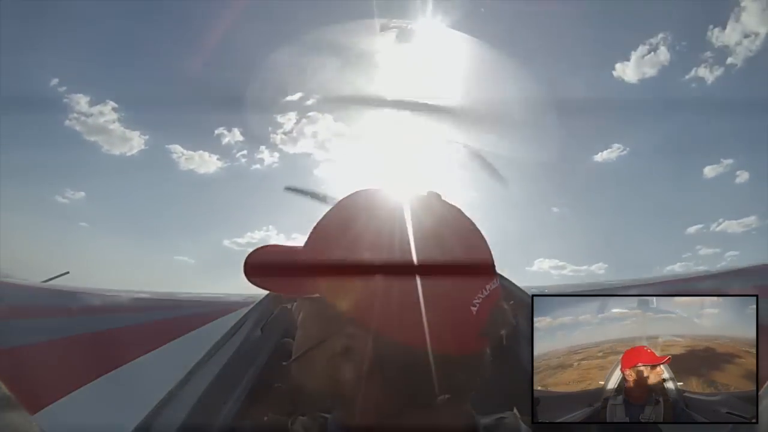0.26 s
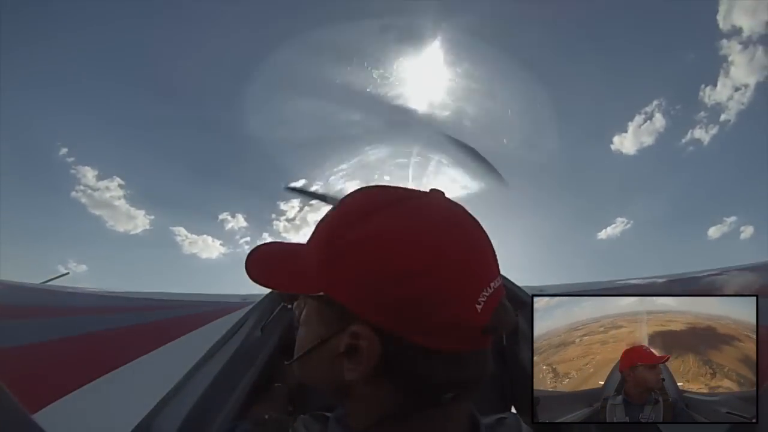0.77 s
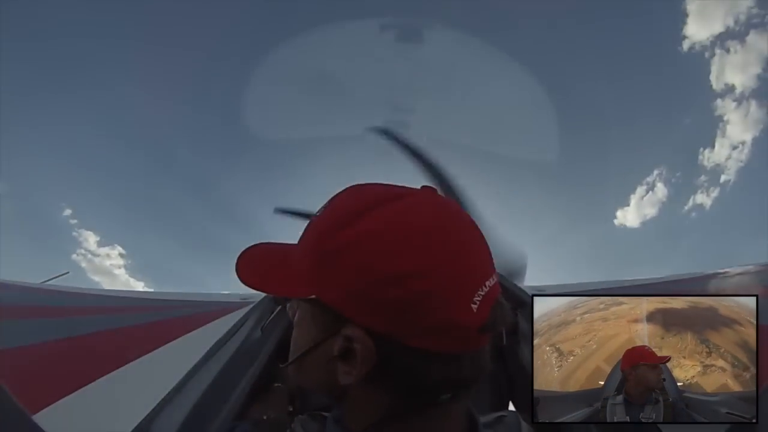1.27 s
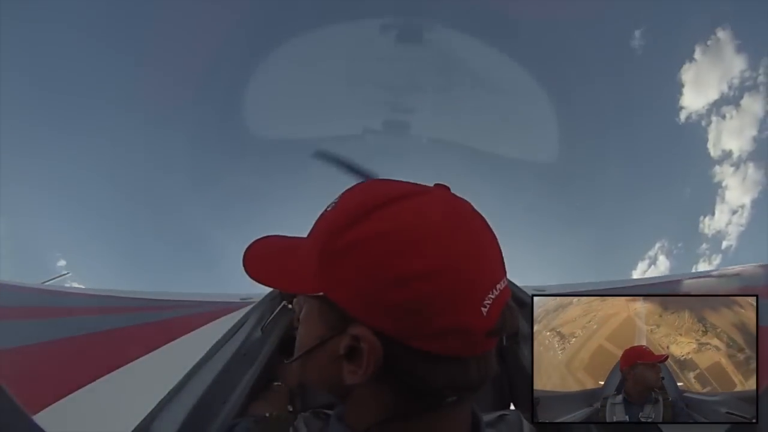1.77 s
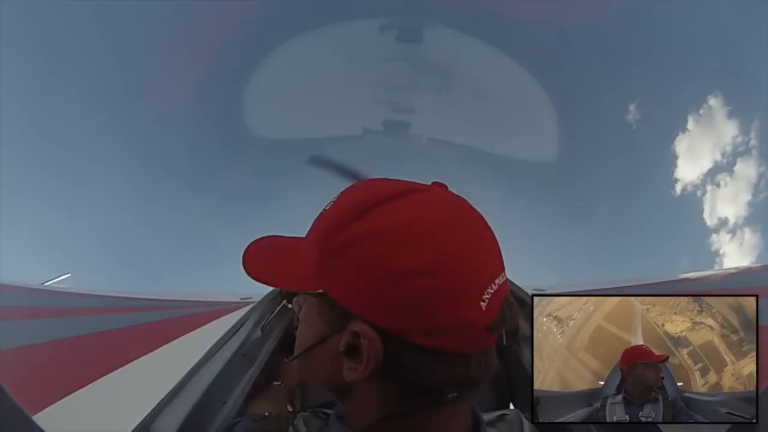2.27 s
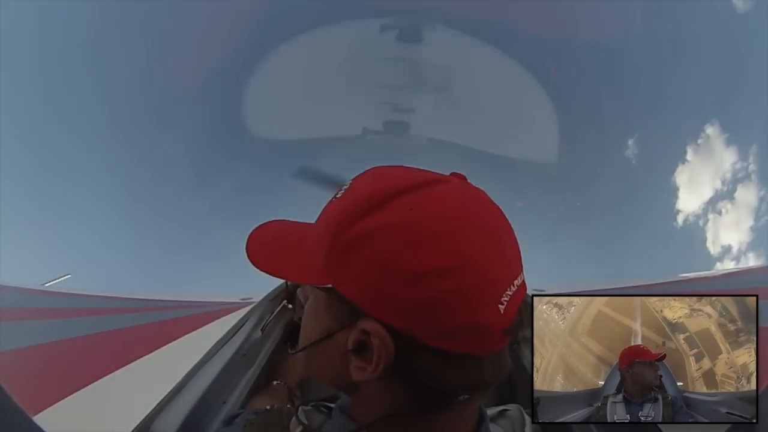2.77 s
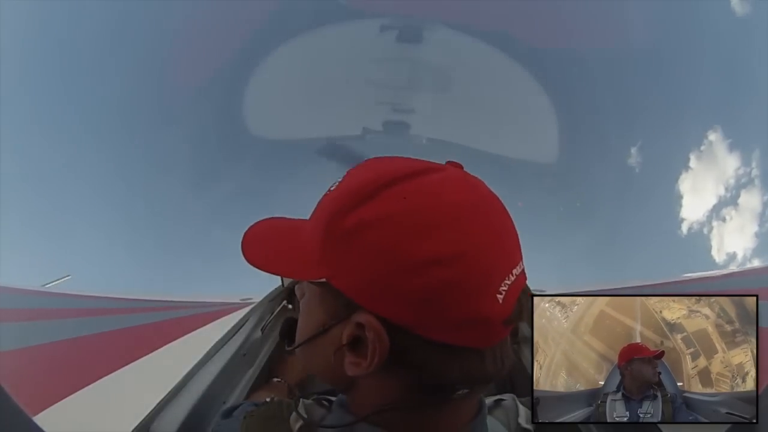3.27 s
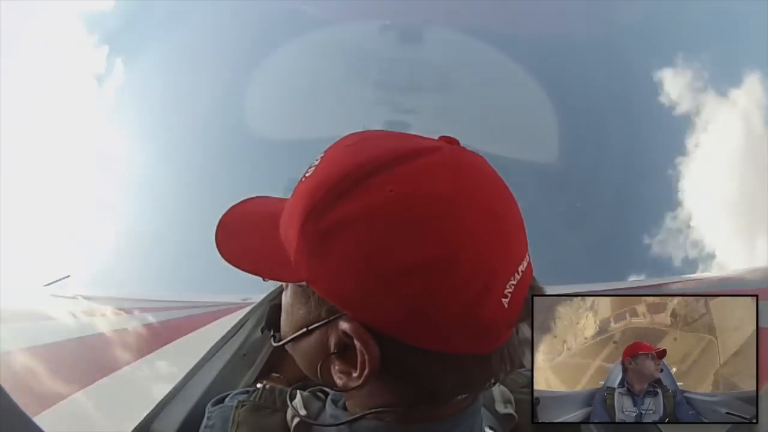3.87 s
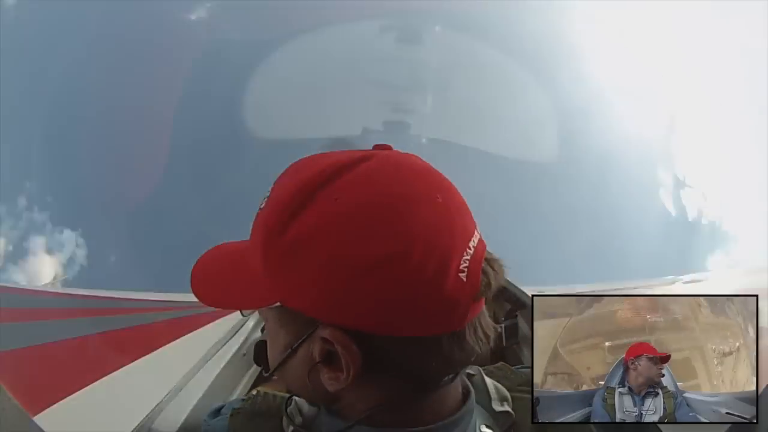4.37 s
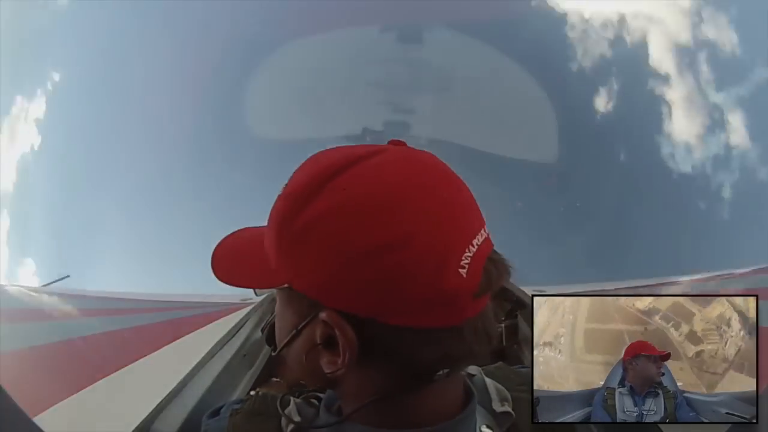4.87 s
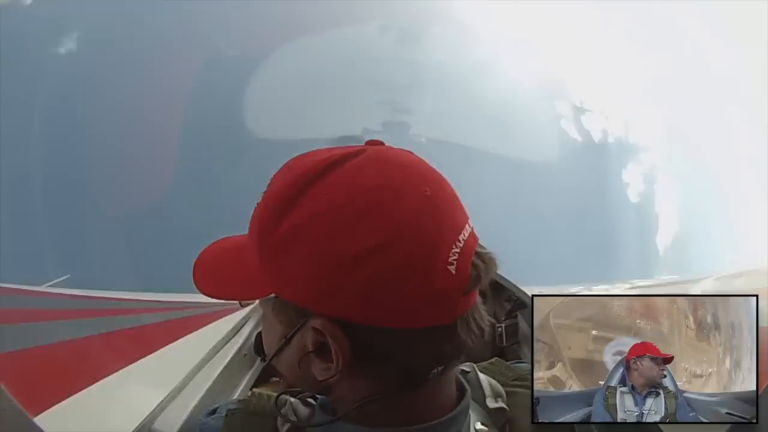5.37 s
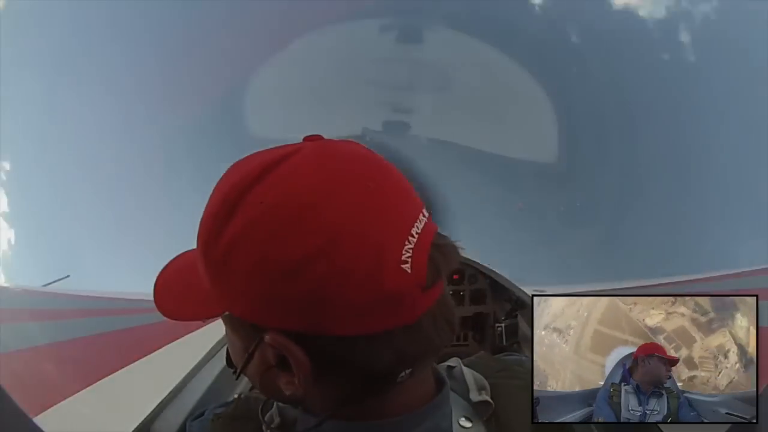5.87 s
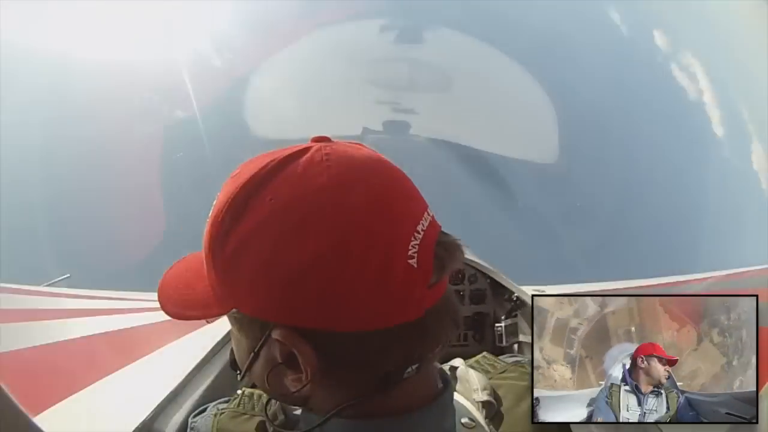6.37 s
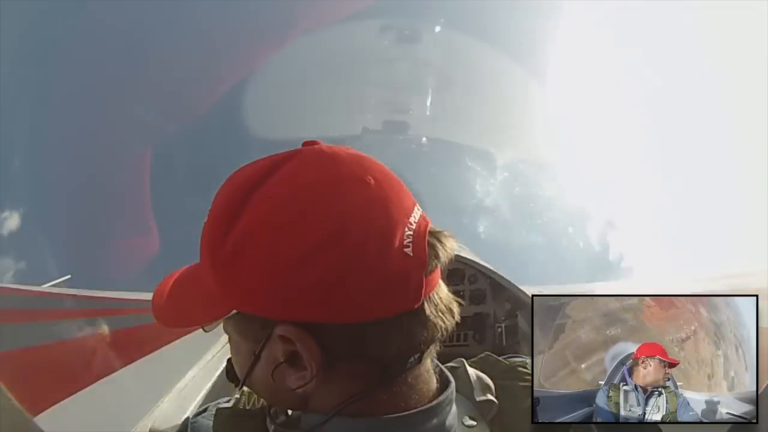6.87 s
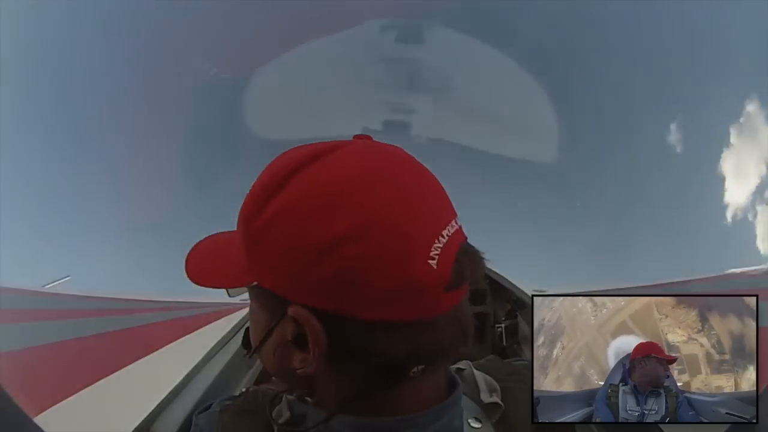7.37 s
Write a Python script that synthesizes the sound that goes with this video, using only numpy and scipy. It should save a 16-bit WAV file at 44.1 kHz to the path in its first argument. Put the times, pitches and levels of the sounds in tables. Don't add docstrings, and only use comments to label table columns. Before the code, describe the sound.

Close inside a small plane's cockpit, a piston engine holds an almost constant low drone, rough and uneven, with booming cabin air and roaring panels. Wind rushes over the canopy and hisses thinly through seals. Low gusts throb and sudden air slaps thump, densest around four to five seconds. The engine note grows clearer late, while a loose fitting ticks faintly. The small microphone distorts slightly and dips after peaks.

```python
import sys
import numpy as np
from scipy import signal
from scipy.fft import rfft, irfft, next_fast_len
from scipy.io import wavfile
from scipy.ndimage import uniform_filter1d, map_coordinates

SR = 44100
rng = np.random.default_rng(int(sys.argv[2]) if len(sys.argv) > 2 else 0)


def gain_from_decibels(decibels):
    exponent = np.asarray(decibels, float) / 20
    return 10 ** exponent


def dump_mix(stems):
    frames = np.atleast_2d(stems).T
    limited = np.clip(frames, -1, 1)
    pcm = np.round(limited * 32767).astype(np.int16)
    wavfile.write(sys.argv[1], SR, pcm)


N = 335601

# start_s (centre), level_db
SURGES = [(0.23, 3), (0.84, 2.5), (1.06, -4), (1.3, -1.5), (2.17, 3), (2.6, 3), (2.75, 2), (2.99, 4.5),
          (4.16, 1.5), (5.67, 3), (5.86, 2.5), (6.63, 2), (7.12, -1.5), (7.48, 1)]
# start_s (centre), level_db, pitch_hz
GUSTS = [(0.08, -21, 66), (0.262, -23, 66), (0.399, -22.5, 77), (0.55, -19.5, 70), (0.789, -30, 71.4),
         (1.041, -18, 67.3), (1.282, -17, 76), (1.412, -23, 78.3), (1.589, -18.5, 67.6),
         (1.77, -20.5, 68.3), (2.0, -15, 75), (2.451, -16, 76.7), (2.639, -16, 72), (2.789, -17, 73.4),
         (3.122, -15, 74), (3.45, -26.5, 81), (3.751, -21, 71), (4.02, -20, 81), (4.219, -16, 77),
         (4.552, -15.5, 71), (4.901, -17.5, 75), (5.1, -15, 72.4), (5.221, -16.5, 69.5), (5.501, -8.5, 74),
         (5.73, -18, 79.6), (6.191, -15, 76.6), (6.391, -14.5, 74.3), (6.551, -13.5, 77.3),
         (6.681, -22, 76.4), (7.458, -17, 73.8)]
# start_s (peak), level_db (peak)
CANOPY_SLAPS = [(0.269, -6.5), (2.216, -11), (2.494, -5.5), (3.268, -16.5), (4.2084, -8), (4.62, -7.5),
                (4.841, -3), (5.0879, -1), (5.105, -5.5), (5.904, -6), (6.961, -9.5)]
# start_s, level_db
TURBULENCE = [(0, -28), (0.9, -25.5), (1.3, -26), (2.4, -24), (3.3, -30), (4.4, -25.5), (6.3, -25.5),
              (6.8, -30), (7.6, -26.5)]
# pitch_hz, level_db (per Hz)
RUSH_SPECTRUM = [(530, -42), (900, -13), (1050, 0), (1200, -1.5), (1320, 1.5), (1730, -9.5), (2380, -3),
                 (2520, -5.5), (2680, -20.5), (2900, -21), (3770, -51), (6380, -120)]
# pitch_hz, level_db (per Hz)
HISS_SPECTRUM = [(2300, -17.5), (2800, 1), (3750, -2), (4000, -5), (4200, -6), (5000, -10.5), (5900, -16.5),
                 (6800, -15), (7800, -21.5), (9500, -31), (11700, -33.5), (13400, -40.5), (14200, -47.5),
                 (15200, -62)]
# start_s, level_db
RATTLE = [(0, -73.5), (0.5, -77), (1.3, -76.5), (3.1, -78.5), (3.5, -70), (5.3, -68.5), (5.65, -73),
          (6.1, -64.5), (7.6, -67)]
# pitch_hz, width_hz, level_db
FITTING_MODES = [
    (10430, 1300, -2),
    (8650, 560, -2),
    (4200, 700, 5.5),
]
# start_s, level_db (peak), pitch_hz (ring)
CLICKS = [(4.2064, -37.5, 3360), (4.4864, -44, 3590), (5.1, -49, 3480), (5.7453, -31.5, 3850),
          (5.905, -40.5, 4200), (6.2935, -37, 4130), (6.8135, -37, 3660), (6.9594, -43.5, 3440),
          (7.1944, -47, 3480), (7.4051, -42, 3770)]
# pitch_hz, level_db (per Hz)
BOOM_SPECTRUM = [(13, -45.5), (22, -24.5), (56, -21.5), (91, -1), (139, -3.5), (173, -7), (203, -9),
                 (258, -15), (333, -13), (376, -28.5), (400, -38.5), (520, -62.5), (880, -120)]
# pitch_hz, level_db (per Hz)
ROAR_SPECTRUM = [(200, -29.5), (340, -3.5), (365, -15.5), (393, -11), (497, 0.5), (595, -8), (672, -5),
                 (777, -6), (885, -20), (1000, -25), (1300, -41.5), (2200, -120)]
# start_s, cycle_hz (one cycle = two crank turns, six firings)
ENGINE_SPEED = [(0.0, 21.02), (0.51, 20.97), (1.01, 20.92), (1.52, 20.86), (2.03, 20.87), (2.54, 20.95),
                (3.04, 21.05), (3.55, 21.21), (4.06, 21.15), (4.57, 21.07), (5.07, 21.0), (5.58, 20.94),
                (6.09, 21.11), (6.6, 21.09), (7.1, 21.21), (7.61, 21.2)]
CYLINDERS = [-4, -2.5, 0.5, -7.5, 2.5, -0.5]
# start_s, level_db
CLEARING = [
    (0, -7),
    (2.3, -6),
    (3, -2),
    (4.5, -1),
    (5.5, 2),
    (6.5, 3),
    (7.61, 3),
]
# start_s, firing_db, octave_db
EXHAUST = [(0.0, -25.5, -24), (0.15, -27, -24.5), (0.55, -28.5, -31), (1.05, -33, -36), (1.3, -24.5, -29.5),
           (2.25, -23.5, -27.5), (2.75, -24.5, -24), (3.25, -22, -22), (3.6, -15, -26.5),
           (4.55, -35, -28.5), (4.85, -18.5, -20.5), (5.3, -20, -25), (5.95, -12.5, -26.5),
           (6.1, -12.5, -40.5), (6.28, -14, -22.5), (6.55, -23.5, -23), (6.95, -11.5, -24),
           (7.5, -21.5, -30.5)]
# start_s, bank_db (one bank firing), crank_db (twice the crank)
MOUNTS = [(0.0, -43, -43), (0.7, -28.5, -25), (1.05, -22.5, -39.5), (1.9, -28, -23), (2.2, -15, -13.5),
          (2.5, -29, -31.5), (3.5, -21.5, -24), (5.2, -21.5, -27.5), (5.45, -20.5, -19.5), (5.9, -41, -21),
          (6.6, -20.5, -19), (7.25, -32, -6.5), (7.6, -19, -18)]
# order (of the cycle), level_db, law_db (per dB of clearing)
AIRFRAME_TONES = [
    (24, -40, 2.5),
    (14.87, -37, 0.06),
    (1.976, -32, .7),
]
# order (of the cycle), level_db
WEAK_ORDERS = [(5, -31), (8, -42), (10, -40), (14, -42), (16, -46), (18, -51), (20, -45), (21, -48),
               (22, -41), (23, -43), (25, -48), (26, -47), (27, -49), (28, -51), (30, -49), (31, -43),
               (32, -49), (34, -49), (38, -48), (62, -55), (64, -52)]
# start_s, depth_db, recovery_s
DUCKS = [(0.102, 1.5, 0.099), (0.28, 0.5, .06), (0.531, 2, .06), (1.02, -0.5, 0.09), (1.207, 2.5, .06),
         (1.272, 6.5, 0.08), (1.492, 1, 0.63), (1.885, 2, 0.37), (2.041, 3.5, 0.47), (2.494, 5, .06),
         (2.612, 8, 0.05), (2.791, 2.5, 0.045), (3.09, 2, 0.05), (3.538, 3.5, 0.19), (3.59, 1, 0.18),
         (3.84, 3, 0.02), (4.208, 8.5, 0.1), (4.35, 2, 0.049), (4.52, 3, .06), (4.622, 7, 0.027),
         (4.852, 6.5, 0.059), (5.091, 3.5, 0.053), (5.108, 8, 0.068), (5.31, 1, 0.49), (5.384, 4, 0.15),
         (5.503, 5, .06), (5.906, 3, 0.84), (6.79, 2.5, 0.94), (6.963, 3.5, 0.14), (7.198, 3, 0.068)]
# pitch_hz, level_db (per Hz)
HOUSING_SPECTRUM = [(1500, -31), (3000, 0), (6000, -4.5), (9000, -12), (12000, -21.5), (15500, -29.5)]

SURGE_S, GUST_S = 0.046, 0.07
SLAP_HZ, SLAP_DECAY_S = 85, 0.022
ROAR_DB, RUSH_DB, HISS_DB = -30.45, -31.5, -50.58
START_CYCLE = 0.75
PHASE_SCATTER, PHASE_LAG = 0.06, 0.044


def unit(x):
    return x / np.sqrt(np.mean(x ** 2) + 1e-20)


def curves(rows):
    s, *columns = np.transpose(rows)
    return [np.interp(np.arange(N) / SR, s, column) for column in columns]


def wobble(rate_hz):
    steps = np.arange(0, N + 64, 64)
    knots = rng.standard_normal(800)
    smooth = map_coordinates(knots, [np.minimum(steps * rate_hz / SR, 798)])
    return np.interp(np.arange(N), steps, smooth)


def filtered(x, response):
    size = next_fast_len(N + 8192)
    spectrum = rfft(x, size) * response(np.fft.rfftfreq(size, 1 / SR))
    return unit(irfft(spectrum, size)[:N])


def coloured(x, points):
    f, db = np.transpose(points)
    return filtered(x, lambda hz: gain_from_decibels(np.interp(np.log(hz + 1), np.log(f + 1), db, -120, -120)))


def shelf(x, hz, db):
    upper = signal.sosfilt(signal.butter(4, hz, "high", fs=SR, output="sos"), x)
    lower = signal.sosfilt(signal.butter(4, hz, "low", fs=SR, output="sos"), x)
    return lower + gain_from_decibels(db) * upper


def patchy(patchy_db):
    z = signal.stft(rng.standard_normal(N + 512), nperseg=512)[2]
    field = uniform_filter1d(rng.standard_normal(z.shape), 6, 0)
    field = uniform_filter1d(field, 10, 1)
    return unit(signal.istft(z * gain_from_decibels(patchy_db * unit(field)), nperseg=512)[1][:N])


def beat(cycles, depth_db):
    return gain_from_decibels(sum(db * np.cos(2 * np.pi * k * cycles + k) for k, db in zip((1, 2, 3), depth_db)))


def firings(cycles, scatter_db, late_s):
    at = np.flatnonzero(np.diff(np.floor(cycles * len(CYLINDERS))))
    luck = rng.standard_normal((1200, 2))[:len(at)]
    size = gain_from_decibels(np.resize(CYLINDERS, len(at)) + scatter_db * luck[:, 0])
    shift = (late_s * SR * luck[:, 1]).astype(int)
    return unit(np.bincount(np.clip(at + shift, 0, N - 1), size, N))


def clatter(cycles, slip):
    pattern = rng.standard_normal(2049)
    place = (cycles + slip * wobble(6)) % 1 * 2048
    return unit(np.interp(place, np.arange(2049), pattern))


def tones(cycles, orders, levels, drift, flutter_db):
    total = np.zeros(N)
    for k, db in zip(orders, levels):
        level = gain_from_decibels(db + flutter_db * wobble(14)) * np.sqrt(2)
        phase = 2 * np.pi * k * cycles + drift * wobble(9)
        phase = phase + PHASE_SCATTER * k * (rng.random() - 0.5) - PHASE_LAG * k ** 2
        total += level * np.cos(phase)
    return total


def gain_db():
    fall_s, rest_db, load_law = 0.003, 1.45, 0.35
    s, depth_db, recovery_s = np.transpose(DUCKS)
    t = np.arange(0, N + 32, 32) / SR
    since = np.maximum(t - s[:, None], 0)
    fall = 1 - np.exp(-(since / fall_s) ** 2)
    ducks = depth_db @ (fall * np.exp(-since / recovery_s[:, None]))
    ducks = uniform_filter1d(np.interp(np.arange(N) / SR, t, ducks), size=48)
    return rest_db - load_law * curves(CLEARING)[0] - ducks


def surge_db():
    t = np.arange(N) / SR
    return sum(db * np.exp(-((t - s) / SURGE_S) ** 2) for s, db in SURGES)


def gusts():
    x, t = np.zeros(N + SR), np.arange(-SR // 4, SR // 4) / SR
    bell = np.exp(-(t / GUST_S) ** 2)
    for (s, db, hz), turn in zip(GUSTS, rng.random(len(GUSTS))):
        song = bell * np.sin(2 * np.pi * (hz * t + turn))
        x[round(s * SR) + SR // 4:][:len(t)] += gain_from_decibels(db + 3) * song
    return x[SR // 2:][:N]


def canopy_slaps():
    x, t = np.zeros(N + 2000), np.arange(2000) / SR
    push = 1 - np.exp(-(t / 0.00063) ** 2)
    fade = gain_from_decibels(-20 * t / SLAP_DECAY_S) * np.cos(np.pi / 2 * t / t[-1])
    swing = np.sin(2 * np.pi * SLAP_HZ * t) * push * fade
    for s, db in CANOPY_SLAPS:
        x[round((s - 0.25 / SLAP_HZ) * SR):][:2000] += gain_from_decibels(db) * swing
    return signal.sosfilt(signal.butter(2, 35, "high", fs=SR, output="sos"), x[:N])


def fitting_ticks(cycles):
    def metal(f):
        total = 0
        for k, (hz, width, db) in enumerate(FITTING_MODES):
            total = total + (-1) ** k * gain_from_decibels(db) * 1j * f * width / (hz * hz - f * f + 1j * f * width)
        return total

    tick_db = curves(RATTLE)[0] + 0.5 * gain_db() + 0.7 * wobble(4.9)
    chatter = firings(cycles, scatter_db=3, late_s=0.003)
    tail = gain_from_decibels(-60 * np.arange(400) / SR / 0.033) + 0.05
    chatter = np.convolve(chatter, tail)[:N] * rng.standard_normal(N)
    ticks = filtered(chatter, lambda f: metal(f) ** 2)
    return gain_from_decibels(1.3 * (tick_db + 76) - 68) * ticks


def slipstream(cycles):
    gust, clear_db, surge = wobble(30), curves(CLEARING)[0], surge_db()
    rush_db = RUSH_DB - 0.029 * clear_db + surge + 0.78 * gust
    hiss_db = HISS_DB + 0.076 * clear_db + 1.1 * surge
    throb = beat(cycles, [0.7, 0.6, 0.4])
    rush = patchy(1.3) * throb + gain_from_decibels(clear_db - 8) * clatter(cycles, slip=0.0015)
    rush = coloured(rush, RUSH_SPECTRUM)
    crackle = gain_from_decibels(0.23 * wobble(100) + 0.85 * gust)
    hiss = coloured(patchy(0.3) * throb * crackle, HISS_SPECTRUM)
    hiss = shelf(hiss, hz=5630, db=-0.45 * clear_db)
    hiss = shelf(hiss, hz=11900, db=-0.7 * clear_db - 7)
    return gain_from_decibels(rush_db) * rush + gain_from_decibels(hiss_db) * hiss


def clicks():
    x, t = np.zeros(N + 600), np.arange(600) / SR
    for s, db, hz in CLICKS:
        ring = np.sin(2 * np.pi * hz * t) * gain_from_decibels(-60 * t / 0.013) * (1 - np.exp(-t / 0.00073))
        click = 0.5 * np.diff(uniform_filter1d(rng.standard_normal(601), size=4))
        x[round(s * SR):][:600] += gain_from_decibels(db + 5) * (ring + click * gain_from_decibels(-60 * t / 0.004))
    return x[:N]


def cabin(cycles):
    clear_db, surge = curves(CLEARING)[0], surge_db()
    pulses = firings(cycles, scatter_db=7.5, late_s=0.00041)
    boom = coloured(0.2 * pulses + patchy(1), BOOM_SPECTRUM)
    boom_db = curves(TURBULENCE)[0] + 0.4 * surge + 5 + 0.5 * wobble(20)
    roar = gain_from_decibels(clear_db - 4) * clatter(cycles, slip=0.006)
    roar = coloured(roar + patchy(0.59) * beat(cycles, [0.8, 0.7, 0.6]), ROAR_SPECTRUM)
    roar_db = ROAR_DB + 1.2 * surge - 0.13 * clear_db + 0.68 * wobble(25)
    return boom * gain_from_decibels(boom_db) + roar * gain_from_decibels(roar_db)


def engine(cycles):
    clear_db = curves(CLEARING)[0]
    exhaust = tones(cycles, orders=(6, 12), levels=curves(EXHAUST), drift=0.18, flutter_db=0.8)
    mounts = tones(cycles, orders=(3, 4), levels=curves(MOUNTS), drift=0.16, flutter_db=2.5)
    frame_orders = [k for k, _, _ in AIRFRAME_TONES]
    frame_levels = [db + law * clear_db for _, db, law in AIRFRAME_TONES]
    frame = tones(cycles, frame_orders, frame_levels, drift=0.32, flutter_db=3.5)
    fuzzy = tones(cycles, orders=(9,), levels=[-36 - 1.16 * clear_db], drift=1.1, flutter_db=2.5)
    weak = tones(cycles, *np.transpose(WEAK_ORDERS), drift=0.35, flutter_db=2.5)
    return exhaust + mounts + frame + fuzzy + weak * gain_from_decibels(clear_db - 1.5)


def scene():
    cycles = START_CYCLE + np.cumsum(curves(ENGINE_SPEED)[0]) / SR
    air = gusts() + canopy_slaps() + slipstream(cycles)
    sharp_sounds = fitting_ticks(cycles) + clicks()
    return (air + sharp_sounds + cabin(cycles) + engine(cycles))[None]


def band_limit(x):
    return signal.sosfilt(signal.butter(12, 14900, fs=SR, output="sos"), x)


def record(dry):
    x = dry * gain_from_decibels(gain_db())
    x = x / (1 + np.abs(x / 1.03) ** 3.1) ** (1 / 3.5)
    swing = uniform_filter1d(np.abs(x / 0.8) ** 4.5, size=90)
    buzz = gain_from_decibels(-40) * swing * coloured(rng.standard_normal(N), HOUSING_SPECTRUM)
    return band_limit(x + buzz)


dry = scene()
out = record(dry)
dump_mix(out)
```